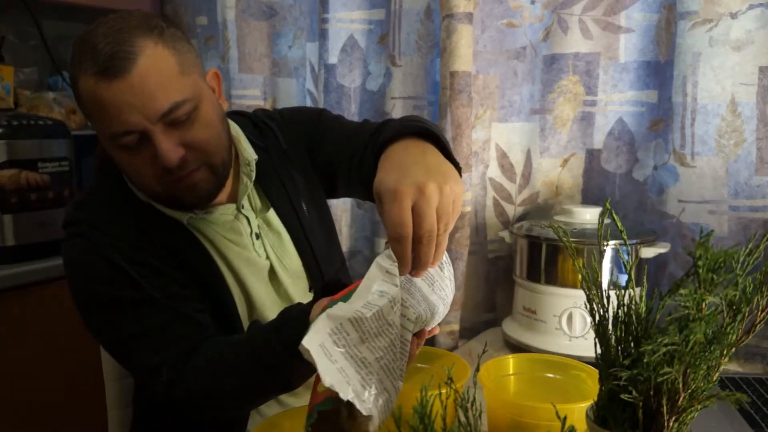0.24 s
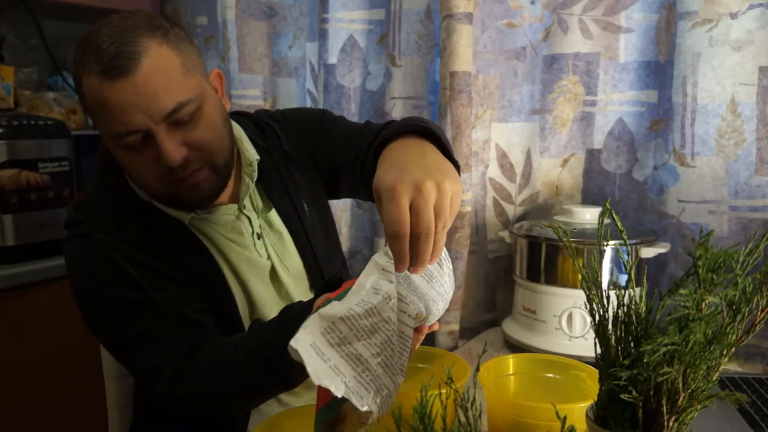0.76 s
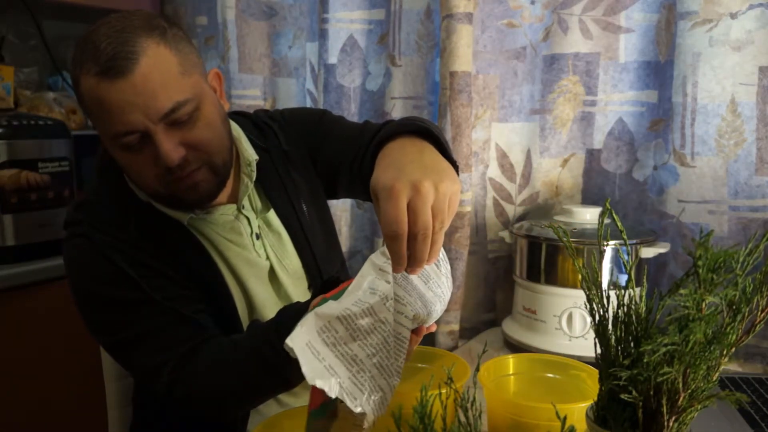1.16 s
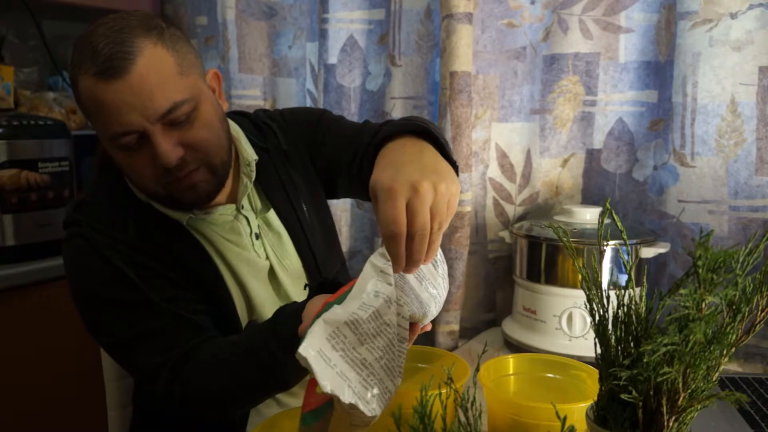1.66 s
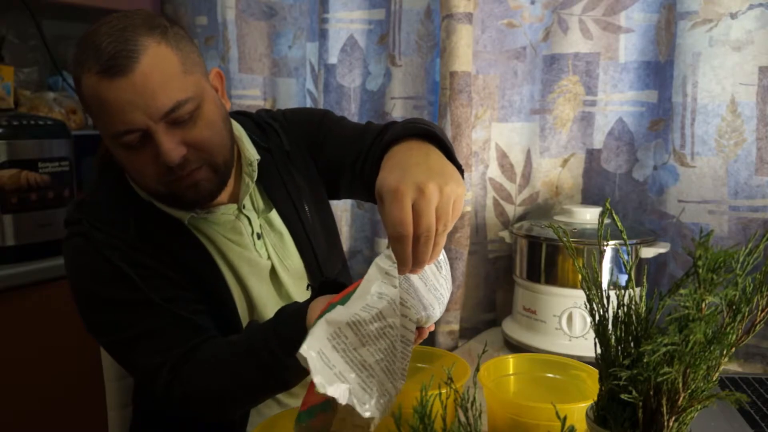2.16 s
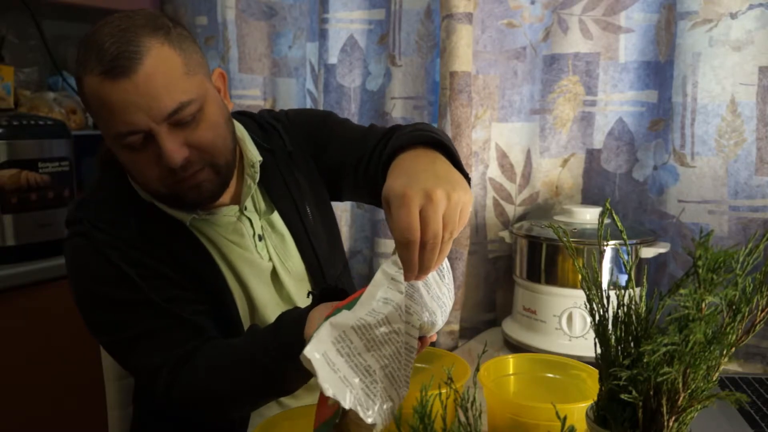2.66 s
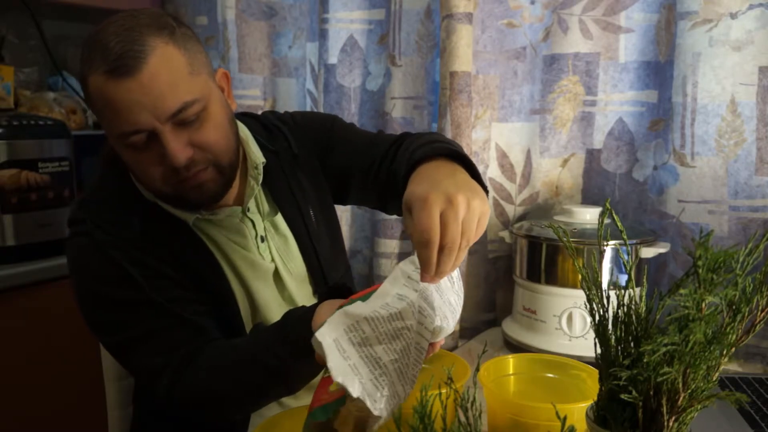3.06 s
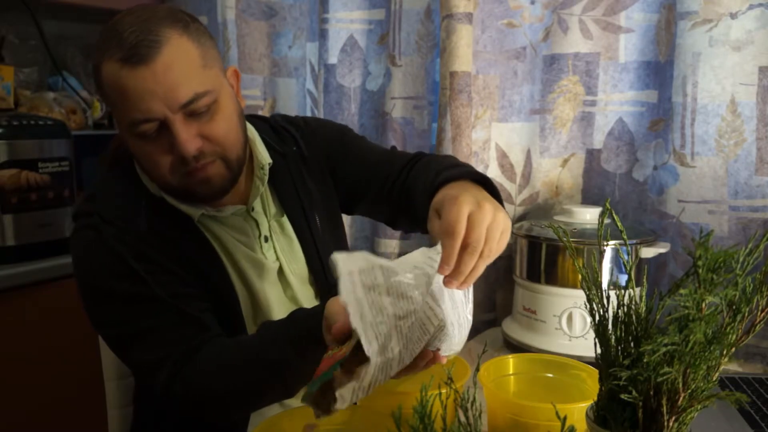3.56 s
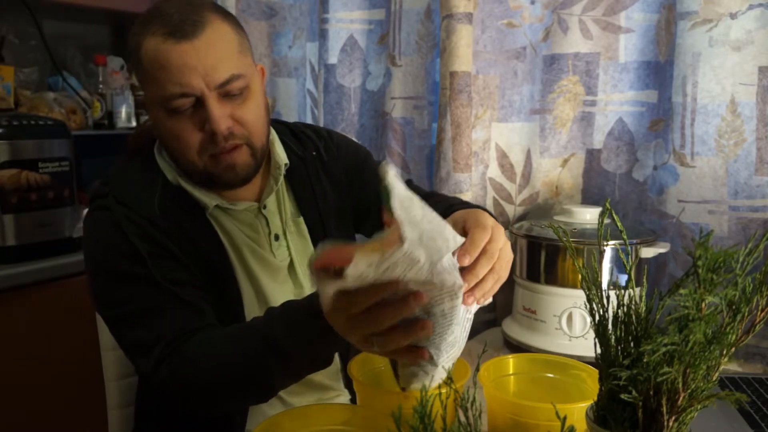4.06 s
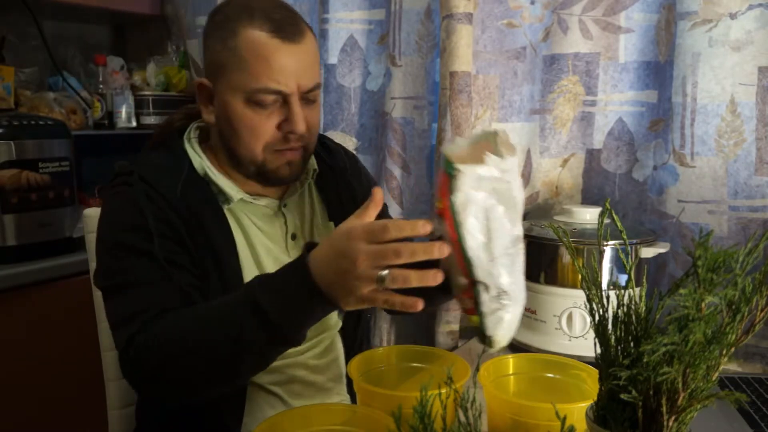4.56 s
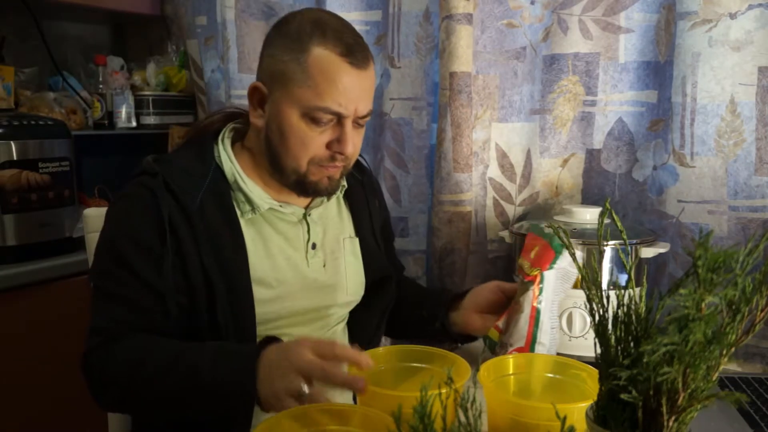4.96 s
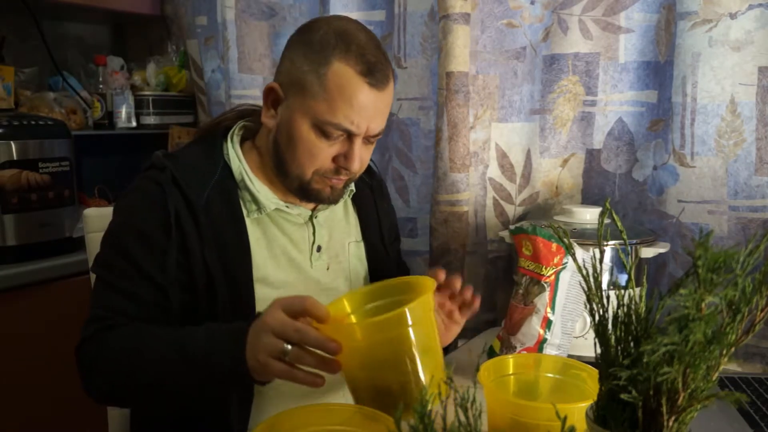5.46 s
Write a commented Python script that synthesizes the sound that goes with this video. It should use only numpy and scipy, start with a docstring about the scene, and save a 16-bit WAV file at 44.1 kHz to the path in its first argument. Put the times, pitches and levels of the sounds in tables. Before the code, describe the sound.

Close, dry stereo pickup in a small kitchen. Dense clay pebbles rattle out of a plastic bag into a thin plastic pot, ringing it hollowly at first. Within a second the stream thins to separate clacks and small trickles. The bag crinkles and pops as more pebbles are shaken out. The pouring stops, the film crackles, then the bag is set down and the pot bumps and scrapes on the table.

```python
"""Clay pebbles poured into a pot

A dense rattle thins out to single clacks, then more pebbles are shaken loose while the plastic bag crinkles.
Pebbles are short clicks of a few damped partials, alone or in a random stream, that also ring the pot's modes.
The film is clumped random snaps, rubbing is fluttering noise, and the late bumps are chatter ringing a thin wall.
A short kitchen tail and a faint hush surround it all, and a fast limiter holds the peaks."""
import sys
import numpy as np
from scipy import signal
from scipy.fft import rfft, irfft, next_fast_len
from scipy.io import wavfile
from scipy.ndimage import uniform_filter1d, minimum_filter1d, map_coordinates

SR = 44100
rng = np.random.default_rng(int(sys.argv[2]) if len(sys.argv) > 2 else 0)


def output_pcm(signal):
    """Save a mono or channel-first signal as 16-bit PCM at the path in sys.argv[1].

    Samples are clipped to [-1, 1] before scaling.
    """
    pcm = np.clip(np.atleast_2d(signal).T, -1, 1) * 32767
    wavfile.write(sys.argv[1], SR, np.round(pcm).astype(np.int16))


N = 252252

# Loose clay rattling in the stream, in the bag, at last under the pot: (time [s], level before trim [dB])
RATTLE_LEVEL = [(0.0, -18.5), (0.21, -18.5), (0.38, -21), (0.64, -23.5), (1.26, -34), (1.5, -33),
                (2.34, -31.5), (2.66, -31), (3.14, -28), (3.39, -24), (3.6, -26), (3.94, -29),
                (4.21, -30.5), (4.4, -31.5), (4.78, -29.5), (5.13, -26.5), (5.72, -30.5)]
# The pour: (time [s], density [pebbles/s], centre pitch [Hz], share landing in the pot [0-1])
POUR = [(0, 800, 2850, 0.97), (0.25, 900, 2680, 1), (0.5, 650, 2320, 0.77), (1, 446, 2100, 0.88),
        (3.7, 450, 2049, 0.8), (4.2, 602, 2230, 0.26), (5.7, 954, 2440, 0)]
# Pebbles striking, with a few strong echoes off a nearby surface 7 ms after a strike: (time [s], click [dB],
# pitch [Hz], sharp crack [dB], hollow pot knock [dB]), levels before trim
CLACKS = [(0.0017, -17, 2570, -27, -35), (0.0156, -20, 3190, -27, -43), (0.0627, -19, 2690, -37, -34),
          (0.0907, -18, 2780, -27, -41), (0.1254, -14, 2440, -30, -27), (0.1385, -17, 2580, -32, -33),
          (0.1432, -18, 2770, -31, -40), (0.1629, -16, 2410, -28, -35), (0.188, -21, 2630, -36, -32),
          (0.2004, -17, 2330, -29, -31), (0.2095, -18, 2330, -35, -40), (0.2185, -20, 2360, -36, -31),
          (0.2265, -18, 2200, -37, -31), (0.278, -21, 2350, -36, -36), (0.3417, -17, 2320, -32, -32),
          (0.357, -18, 2260, -34, -32), (0.4076, -16, 2220, -34, -41), (0.4271, -18, 2060, -31, -31),
          (0.4441, -17, 1890, -34, -32), (0.4889, -19, 2590, -29, -33), (0.5007, -21, 2300, -26, -30),
          (0.5313, -17, 2230, -30, -36), (0.5513, -18, 1810, -36, -44), (0.578, -21, 2040, -30, -42),
          (0.6055, -20, 2180, -32, -42), (0.6663, -20, 2140, -35, -28), (0.7602, -19, 2190, -31, -37),
          (0.8406, -16, 2330, -28, -33), (0.9005, -21, 2210, -30, -36), (0.9387, -20, 2320, -33, -37),
          (1.064, -29, 1960, -43, -35), (1.0743, -21, 2360, -29, -27), (1.1755, -29, 2370, -37, -54),
          (1.1937, -25, 2450, -33, -38), (1.268, -27, 2490, -38, -41), (1.3171, -16, 2340, -29, -34),
          (1.324, -23, 2350, -32, -35), (1.4289, -23, 2030, -33, -38), (1.4353, -18, 2350, -34, -37),
          (1.882, -21, 2260, -27, -30), (2.0129, -17, 1890, -28, -28), (2.052, -21, 2840, -27, -28),
          (2.0572, -20, 2740, -30, -25), (2.1185, -15, 2240, -27, -30), (2.1915, -16, 2040, -23, -30),
          (2.1987, -18, 2490, -27, -35), (2.2405, -21, 2390, -28, -49), (2.292, -18, 2900, -30, -28),
          (2.3805, -17, 2370, -29, -34), (2.4426, -20, 2290, -33, -30), (2.584, -24, 2220, -35, -32),
          (2.6084, -18, 1770, -33, -24), (2.6566, -23, 2280, -32, -34), (2.7268, -23, 2010, -28, -25),
          (2.8489, -20, 2160, -26, -35), (3.156, -23, 2310, -30, -37), (3.1947, -20, 2300, -27, -34),
          (3.2402, -19, 2820, -34, -30), (3.2835, -23, 2420, -36, -46), (3.3367, -19, 2250, -25, -35),
          (3.3688, -17, 1830, -32, -26), (3.3875, -18, 2360, -32, -39), (3.4065, -23, 1920, -32, -38),
          (3.433, -18, 1960, -31, -35), (3.4641, -22, 2500, -33, -34), (3.4748, -19, 2800, -33, -40),
          (3.5117, -16, 2200, -29, -40), (3.57, -23, 2410, -35, -34), (3.5985, -17, 2140, -25, -29),
          (3.6037, -21, 2390, -29, -24), (3.6449, -20, 2020, -25, -39), (3.8043, -18, 2440, -30, -30),
          (4.2272, -21, 2060, -38, -34), (4.3375, -21, 2210, -32, -29), (4.7032, -19, 2060, -43, -40)]
# Partials of one click: (pitch ratio [1], level [dB])
CLICK_PARTIALS = [(0.63, -5), (1.0, 0), (1.52, -3)]
# Modes of the filling pot: (frequency [Hz], width [Hz], gain nearly empty [dB], gain filled [dB])
POT_MODES = [(500, 15, 1, -20), (612, 34, 15.5, 11), (646, 25, 4, 9), (1514, 270, -10, -0.5),
             (1804, 34, 10, -8), (1924, 29, -9, -24), (2310, 70, 2, -3.5), (2504, 71, 1.5, -25),
             (2770, 78, -2, -30)]
# Fine, steady crackle of the bag: (time [s], level before trim [dB])
CRACKLE_LEVEL = [(0.0, -35), (0.4, -34), (0.67, -34.5), (1.26, -46), (1.91, -40.5), (2.02, -39.5),
                 (2.69, -33.5), (2.9, -41.5), (3.06, -37.5), (3.49, -34), (3.89, -46.5), (4.19, -40),
                 (4.4, -37.5), (4.48, -45), (4.73, -37.5), (5.3, -38), (5.58, -40.5), (5.72, -58)]
# Folds of the bag giving way: (time [s], starting level before trim [dB])
FOLDS = [(1.028, -24), (1.073, -27), (1.19, -39), (1.2421, -32), (1.512, -25), (1.6544, -28), (1.742, -26),
         (1.779, -28), (1.882, -21.5), (2.1939, -27), (2.239, -20.5), (2.523, -21.5), (2.803, -20.5),
         (2.8455, -29), (3.193, -21.5), (3.329, -29), (3.443, -17.5), (3.645, -23), (3.7793, -22.5),
         (3.861, -28), (4.2782, -25), (4.803, -27)]
# Stiff creases popping over: (time [s], click [dB], pitch [Hz], sharp crack [dB]), levels before trim
POPS = [(0.6997, -21, 2470, -26), (1.6551, -28, 2490, -33), (1.7439, -27, 2240, -28),
        (1.7824, -26, 2520, -28), (1.8725, -28, 2170, -34), (2.469, -26, 3270, -30),
        (2.9761, -19, 3000, -28), (2.9893, -23, 3670, -31), (3.684, -18, 2650, -37),
        (3.7423, -16, 2590, -37), (3.7792, -25, 3460, -24), (3.819, -21, 3030, -34),
        (3.8584, -23, 2920, -25), (3.8655, -31, 2600, -27), (3.9613, -29, 2600, -32),
        (3.992, -34, 2240, -34), (4.2312, -25, 2680, -28), (4.2792, -21, 2860, -27),
        (4.365, -23, 2530, -30), (4.3946, -22, 2540, -40), (4.4313, -31, 2530, -22),
        (4.496, -26, 2980, -32), (4.559, -25, 2480, -39), (4.565, -25, 3050, -32), (4.656, -42, 3060, -31),
        (4.7455, -24, 2380, -34), (4.81, -34, 2610, -31)]
# Hands and sleeves rubbing on the bag: (time [s], level before trim [dB])
HANDS_LEVEL = [(0, -56), (1.2, -55.5), (2.2, -52), (2.7, -46.5), (3.8, -53), (4.1, -46), (5.72, -48.5)]
# The bag is shaken, squeezed or turned:
# (time [s], length [s], moved pebbles [dB], film crinkle [dB]), levels before trim
SHAKES = [(0.125, 0.87, -23.5, -37.5), (0.53, 0.058, -26, -30), (0.76, 0.094, -26.5, -37),
          (1.0, 0.13, -33, -46), (1.64, 0.45, -32, -46), (2.35, 0.12, -25.5, -35), (2.52, 0.39, -25.5, -32),
          (2.79, 0.15, -28.5, -31.5), (3.12, 0.13, -27.5, -34.5), (3.3, 0.1, -25.5, -30.5),
          (3.55, 0.18, -48, -35), (4.18, 0.4, -27, -38), (4.39, 0.27, -30.5, -33.5), (4.69, 0.15, -37, -51),
          (4.903, 0.045, -24.5, -30.5)]
# The empty pot is pushed over the table:
# (time [s], length [s], crunching clay crumbs [dB], rubbing [dB]), levels before trim
SLIDES = [(4.97, 0.46, -41, -41.5), (5.36, 0.18, -29, -43.5), (5.64, 0.15, -27.5, -68)]
# The hands hold still for an instant: (time [s], length [s])
PAUSES = [(0.078, 0.034), (0.514, 0.034), (0.572, 0.016), (1.126, 0.059), (1.358, 0.046), (1.942, 0.043),
          (3.229, 0.025), (4.631, 0.033), (4.791, 0.12)]
# Bag and pot bumping the table and each other:
# (time [s], dry peak [dB], resonance [Hz], time to fall 60 dB [s])
BUMPS = [(4.894, -24, 3080, 0.06), (4.915, -16, 1350, 0.091), (5.196, -15.5, 2500, 0.1),
         (5.2235, -14, 590, 0.052), (5.226, -16, 2300, 0.05), (5.249, -14, 2700, 0.012),
         (5.34, -19, 1700, 0.019), (5.371, -13, 1320, 0.02), (5.383, -13.5, 1360, 0.022),
         (5.412, -28, 1380, 0.043), (5.43, -12.5, 2300, 0.024), (5.435, -13, 2600, 0.049),
         (5.542, -22, 1620, 0.053), (5.67, -17, 2737, 0.079)]
# Modes of the empty pot's wall: (frequency [Hz], width [Hz], gain [dB])
WALL_MODES = [(363, 40, 3), (586, 152, 4), (670, 35, -3), (1348, 22, 11.5), (1490, 30, 3), (1737, 21, 13),
              (2630, 46, 3), (3070, 67.7, 7), (3680, 53, 5)]
# Tone of the clay: (frequency [Hz], gain [dB])
CLAY_TONE = [(60, -30), (200, -25.5), (400, -14), (800, -3.5), (1150, -5.5), (2300, -0.5), (4000, -4),
             (8000, -4), (12000, -20), (16000, -20)]
# Bright edge of a click: (frequency [Hz], gain [dB])
CRACK_TONE = [(1000, -37), (3300, -13), (5200, 0), (8500, -2), (12000, -8.5), (16000, -29)]
# Tone of the plastic film: (frequency [Hz], gain [dB])
FILM_TONE = [(80, -67), (200, -27), (400, -4.5), (1000, 7.5), (3000, 3.5), (5500, -0.5), (8000, 1.5),
             (11000, -1.5), (13500, -6.5), (16000, -15)]
# Tone of the rubbing: (frequency [Hz], gain [dB])
RUB_TONE = [(60, -17), (170, -26), (290, -2.5), (450, 1), (800, 2), (1200, 4), (3000, -1), (6000, -5),
            (15000, -68)]
# Tone of the steady background: (frequency [Hz], relative gain [dB])
HUSH_TONE = [(25, -2), (80, -6), (200, 3), (1000, 19), (15000, -2)]
# Side part of the room tail: (frequency [Hz], gain [dB])
TAIL_WIDTH = [(100, -19), (500, -20), (1000, -9.5), (2200, -11.5), (4500, -6), (8000, -16.5), (14000, -68)]
# Decay of the kitchen: (frequency [Hz], time to fall 60 dB [s])
KITCHEN_DECAY = [(200, 0.31), (1000, 0.16), (3000, 0.14), (8000, 0.12), (15000, 0.11)]

FILLED_S = 1  # by then the clay lies deep enough to damp the pot's wall
CLICK_S = 0.004  # the levels of clacks and pops are rms over this time
ROCK_S, ROCK_DB = 0.001001, -4  # touch of a second neighbour: typical delay, relative level
KNOCK_HZ, KNOCK_S = 656, 0.0011  # a pebble's push on the pot's bottom: typical pitch, decay
ECHO_S, ECHO_DB = 0.0071, -26.5  # a nearby surface throws the pour back
SETTLE_DB, SETTLE_DB_PER_S = -14, -220  # neighbours knocked loose: start relative to the click, slope
JAM_S, JAM_DB = 0.033, 1  # the bag's mouth clogs before a pebble breaks free: how long, how much quieter
PAUSE_DB = 7.5  # drop of the steady rattle, crackle and rubbing while the hands rest
SHAKE_RISE = 0.23  # share of a stroke spent speeding up
FOLD_S = 0.052  # time for a fold's run of snaps to fall by 30 dB
TAIL_LOW_HZ = 190  # the room's tail holds little below this
TOP_HZ = 16000  # band limit of the output


def pebbles(stream_db):
    """Porous clay balls click on each other; those in the pot also ring its hollow."""
    density, pitch, in_pot = curves(POUR)
    times = arrivals(density)
    sizes = amp(5.4 * np.minimum(rng.standard_normal(len(times)), 1.25))
    scatter = np.exp(0.24 * rng.standard_normal(len(times)))
    pitches = np.interp(times * SR, np.arange(N), pitch) * scatter
    clicks = sizes[:, None] * contacts(pitches, ring_s=0.00034, crack_db=-7.5)
    # Dividing by the root of the density keeps the level independent of how many pebbles fall
    rattle = place(times, clicks) / np.sqrt(density)
    stream = unit(rattle) * amp(stream_db - 0.5)
    clay = coloured(stream, CLAY_TONE) + strikes()
    pour = clay + pot(clay * in_pot) + knocks()
    echo = filtered(pour, lambda hz: np.exp(-2j * np.pi * hz * ECHO_S))
    return pour + amp(ECHO_DB) * echo


def strikes():
    """Each strike, or its strong echo, cracks onto the heap and rocks against a second neighbour."""
    s, db, hz, crack_db, _ = np.transpose(CLACKS)
    chance = rng.standard_normal((len(s), 2))
    rock_s = ROCK_S * np.exp(0.313 * chance[:, 1:])
    rock_hz = hz * np.exp(0.16 * chance[:, 0])
    first = contacts(hz, ring_s=0.00055, crack_db=-14)
    second = contacts(rock_hz, ring_s=0.0007, crack_db=-14, delay_s=rock_s)
    click = coloured(first + amp(ROCK_DB) * second, CLAY_TONE)
    return place(s, sized(click, db - 1.24) + cracks(crack_db - 0.8, decay_s=0.00097))


def contacts(pitch_hz, ring_s, crack_db, delay_s=0, size=384):
    """One contact of peak 1 per pitch: a gritty scrape together with a few cycles of ringing."""
    t = np.maximum(np.arange(size) / SR - delay_s, 0)
    detune = np.exp(0.067 * rng.standard_normal((len(pitch_hz), len(CLICK_PARTIALS))))
    hz = pitch_hz[:, None] * detune
    ring = sum(amp(db) * np.sin(2 * np.pi * ratio * f[:, None] * t)
               for (ratio, db), f in zip(CLICK_PARTIALS, hz.T))
    swell = 1 - np.exp(-t / 0.0003)
    ring = crest(ring * swell * np.exp(-t / ring_s))
    grit = rng.standard_normal(ring.shape) * np.exp(-t / 0.0011) * (t > 0)
    return crest(ring + amp(crack_db) * grit)


def cracks(db, decay_s, size=384):
    """The bright edge of each click: a noise burst that swells and dies at once."""
    u = np.arange(size) / SR / decay_s
    burst = rng.standard_normal((len(db), size)) * np.sqrt(u) * np.exp(-u)
    return sized(coloured(burst, CRACK_TONE), db)


def knocks():
    """The heap passes each strike on to the pot's bottom as a short, hollow knock."""
    s, *_, db = np.transpose(CLACKS)
    t = np.arange(SR // 50) / SR
    hz = KNOCK_HZ * np.exp(0.087 * rng.standard_normal((len(s), 1)))
    push = np.sin(2 * np.pi * hz * t) * t * np.exp(-t / KNOCK_S)
    return place(s, sized(coloured(push, CLAY_TONE), db + 0.2))


def pot(x):
    """The pot's ringing crossfades from its nearly empty mode levels to the more damped filled ones."""
    hz, width, early_db, late_db = np.transpose(POT_MODES)
    filled = np.clip(np.arange(N) / SR / FILLED_S, 0, 1) ** 4
    early = resonate(x * (1 - filled), np.transpose([hz, width, early_db]))
    late = resonate(x * filled, np.transpose([hz, width, late_db]))
    return early + late


def bag(crinkle_db):
    """The film crackles in clumps as it is bent; a fold gives way in a quick run of snaps."""
    clumps = amp(1.53 * wobble(110))
    steady = unit(crinkle(rate=1000, scatter_db=3.0) * clumps) * amp(crinkle_db + 2.0)
    s, db = np.transpose(FOLDS)
    t = np.arange(SR // 6) / SR
    runs = place(s, amp(db[:, None] - 1.5 - 30 * t / FOLD_S))
    folds = runs * crinkle(rate=2000, scatter_db=10.0)
    return coloured(steady + folds, FILM_TONE)


def crinkle(rate, scatter_db):
    """Tiny creases of plastic film snapping at random, rms 1."""
    times = arrivals(rate)
    sizes = amp(scatter_db * np.minimum(rng.standard_normal(len(times)), 2))
    pitches = 7000 * np.exp(0.6 * rng.standard_normal(len(times)))
    snaps = grains(pitches, width=2.56, life=0.00072, size=128)
    return unit(place(times, sizes[:, None] * snaps))


def grains(pitch_hz, width, life, size=512):
    """One dry snap per pitch, all of like energy: a short noise burst in one broad resonance."""
    t, f = np.arange(size) / SR, np.fft.rfftfreq(size, 1 / SR)
    envelope = np.exp(-(t / life) ** 2)
    burst = rng.standard_normal((len(pitch_hz), size)) * envelope
    ratio = f / pitch_hz[:, None]
    resonance = 1j * ratio * width / (1 - ratio ** 2 + 1j * ratio * width)
    snap = irfft(rfft(burst) * resonance, size)
    return .5 * snap * np.linalg.norm(envelope) / np.linalg.norm(snap, axis=1, keepdims=True)


def pops():
    """A stiff crease flips over with one short, dry snap."""
    s, db, hz, crack_db = np.transpose(POPS)
    click = coloured(contacts(hz, ring_s=0.00045, crack_db=-17), CLAY_TONE)
    return place(s, sized(click, db - 0.7) + cracks(crack_db - 0.6, decay_s=0.0005))


def bumps():
    """Each bump is a brief chatter of contacts, duller when its resonance is low, that rings a thin pot wall."""
    t = np.arange(SR // 4) / SR
    blows = []
    for s, db, hz, length in BUMPS:
        chatter = rng.standard_normal(len(t)) * amp(-60 * t / length)
        blow = resonate(chatter, [(hz, 0.73 * hz, 0)])
        rung = blow + resonate(blow, WALL_MODES)
        blows.append(amp(db) * crest(coloured(rung, CLAY_TONE)))
    return place(np.transpose(BUMPS)[0], np.array(blows))


def rubbing(rub_db):
    """Bag, hands and pot slide against each other and over the table: noise with a fluttering level."""
    slips = rng.standard_normal(N) * amp(4.3 * wobble(250))
    return unit(coloured(slips, RUB_TONE)) * amp(rub_db + 8.0)


def activity(flow_db, grip_db, hands_db):
    """Levels in dB of clay, film and rubbing: powers of steady handling, strokes and settling add up."""
    (flow,), (grip,), (hands,) = curves(RATTLE_LEVEL), curves(CRACKLE_LEVEL), curves(HANDS_LEVEL)
    shaken, squeezed = strokes(SHAKES)
    crumbs, sliding = strokes(SLIDES)
    free = jams()
    clay = (free * amp(flow + flow_db)) ** 2 + shaken + crumbs + settling()
    film = (free * amp(grip + grip_db)) ** 2 + squeezed
    rub = (free * amp(hands + hands_db)) ** 2 + sliding
    return 10 * np.log10([clay, film, rub])


def strokes(rows):
    """Power of two layers under hand strokes that quickly gather speed and then ease off."""
    t = np.arange(N) / SR
    power = np.zeros((2, N))
    for s, length, *levels_db in rows:
        ramp = np.interp(t, [s, s + SHAKE_RISE * length, s + length], [0, 1, 0])
        speed = np.sin(np.pi / 2 * ramp)
        power += (amp(levels_db)[:, None] * speed) ** 2
    return power


def settling():
    """Power of the short trickle that each strike sets off."""
    s, db, *_ = np.transpose(CLACKS)
    t = np.arange(SR // 4) / SR
    return place(s, amp(db[:, None] + SETTLE_DB + SETTLE_DB_PER_S * t) ** 2)


def jams():
    """Gain of the steady sounds: they dip ahead of each strike, and sink when the hands rest."""
    t = np.arange(N) / SR
    stalls = [np.interp(t, [s - JAM_S, s - JAM_S / 2, s], [0, 1, 1], right=0) for s, *_ in CLACKS]
    stall = np.max(stalls, axis=0)
    rest = sum(np.sin(np.pi * np.clip((t - s) / length, 0, 1)) for s, length in PAUSES)
    return amp(-JAM_DB * stall - PAUSE_DB * rest)


def kitchen(x, tail_db, size=4096):
    """The dry sound in the middle plus a short diffuse stereo tail, drawn afresh for every block."""
    pieces = np.pad(x, (0, -N % size)).reshape(-1, size)
    noise = rng.standard_normal((2, len(pieces), SR // 5))
    hz, t, z = signal.stft(noise, SR, nperseg=256)
    decay = amp(-60 * t / along(KITCHEN_DECAY, hz)[:, None])
    tails = signal.istft(z * decay * (t > .004), SR, nperseg=256)[1]
    tails *= amp(tail_db) / np.linalg.norm(tails, axis=2, keepdims=True)
    starts = np.arange(len(pieces)) * size / SR
    mid, side = (place(starts, signal.fftconvolve(pieces, tail, axes=1)) for tail in tails)
    low_cut = lambda f: f ** 4 / (f ** 4 + TAIL_LOW_HZ ** 4)
    mid = filtered(mid, low_cut)
    side = filtered(coloured(side, TAIL_WIDTH), low_cut)
    return np.array([x + mid + side, x + mid - side])


def hush():
    """Faint, steady background: coloured noise, the same in both channels."""
    return amp(-62) * unit(coloured(rng.standard_normal(N), HUSH_TONE))


def amp(db):
    """Decibels to gain."""
    return 10 ** (np.asarray(db) / 20)


def unit(x):
    """Scale to rms 1."""
    return x / np.sqrt(np.mean(x ** 2) + 1e-20)


def crest(x):
    """Scale each row to peak 1."""
    return x / (np.abs(x).max(-1, keepdims=True) + 1e-20)


def sized(x, db):
    """Scale each row to its level over the time of one click."""
    return amp(db)[:, None] * x * np.sqrt(CLICK_S * SR) / np.linalg.norm(x, axis=1, keepdims=True)


def along(points, hz):
    """Interpolate (frequency [Hz], value) points on a log axis."""
    f, v = np.transpose(points)
    return np.interp(np.log(hz + 1), np.log(f + 1), v)


def curves(rows):
    """One value per sample for each column after the time."""
    s, *cols = np.transpose(rows)
    return [np.interp(np.arange(N) / SR, s, c) for c in cols]


def wobble(rate):
    """A smooth random curve, rate knots a second."""
    knots = rng.standard_normal(int(N * rate / SR) + 4)
    return map_coordinates(knots, [np.arange(N) * rate / SR])


def arrivals(rate):
    """Random times at a rate per second."""
    return np.flatnonzero(rng.random(N) < rate / SR) / SR


def place(times, sounds):
    """Sum the rows of sounds, each starting at its time."""
    starts = np.round(np.maximum(times, 0) * SR).astype(int)
    at = starts[:, None] + np.arange(sounds.shape[1])
    return np.bincount(at.ravel(), sounds.ravel(), N)[:N]


def filtered(x, response):
    """x times a complex response of frequency, padded against wrap-around."""
    m = 2 * next_fast_len(x.shape[-1] // 2 + 4096)
    return irfft(rfft(x, m) * response(np.fft.rfftfreq(m, 1 / SR)), m)[..., :x.shape[-1]]


def coloured(x, spectrum):
    """Causal filter with the gain of (frequency [Hz], gain [dB]) points."""
    def response(hz):
        # Folding the cepstrum onto positive time gives minimum phase
        cepstrum = irfft(np.log(amp(along(spectrum, hz))))
        half = len(cepstrum) // 2
        cepstrum[1:half] *= 2
        cepstrum[half + 1:] = 0
        return np.exp(rfft(cepstrum))
    return filtered(x, response)


def resonate(x, modes):
    """The ringing of (frequency [Hz], width [Hz], gain [dB]) modes driven by x."""
    def response(f):
        return sum(amp(db) * 1j * f * w / (c * c - f * f + 1j * f * w) for c, w, db in modes)
    return filtered(x, response)


def scene():
    """The pour leans a little left while it lands in the pot; the handling is straight ahead."""
    stream_db, crinkle_db, rub_db = activity(flow_db=-1.5, grip_db=1, hands_db=1.5)
    pour = pebbles(stream_db)
    handling = bag(crinkle_db) + rubbing(rub_db) + bumps()
    left_db = 0.5 * curves(POUR)[2]  # follows the share landing in the pot
    placed_pour = kitchen(pour, tail_db=-7.0) * amp([left_db, -left_db])
    return placed_pour + kitchen(handling, tail_db=-3.5) + kitchen(pops(), tail_db=-6.0) + hush()


def record(dry):
    """A fast limiter holds down the tallest peaks; nothing is kept above the band limit."""
    needed = np.minimum(1, amp(-4.6) / (np.abs(dry).max(0) + 1e-9))
    gain = uniform_filter1d(minimum_filter1d(needed, size=200), size=160)
    return filtered(dry * gain, lambda hz: hz < TOP_HZ)


dry = scene()
out = record(dry)
output_pcm(out)
```